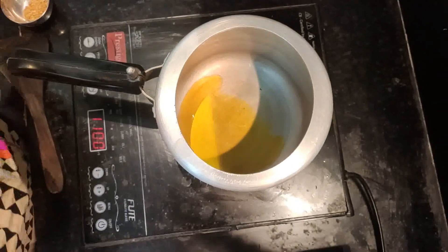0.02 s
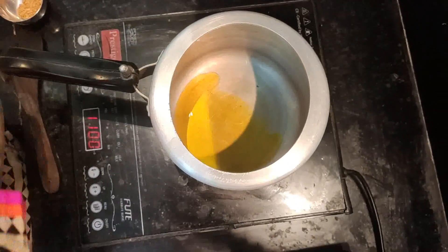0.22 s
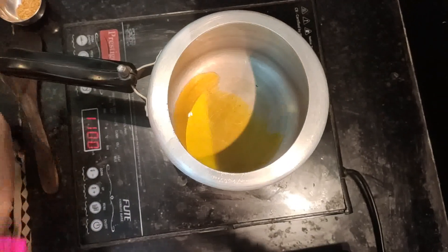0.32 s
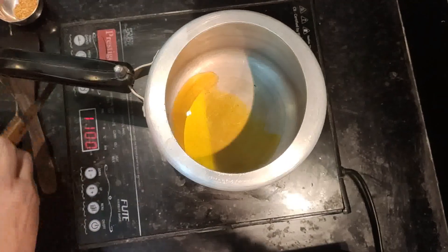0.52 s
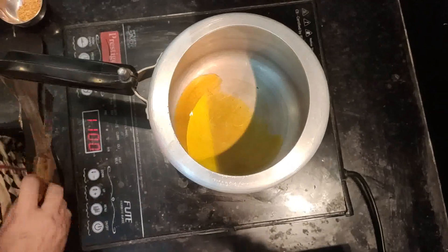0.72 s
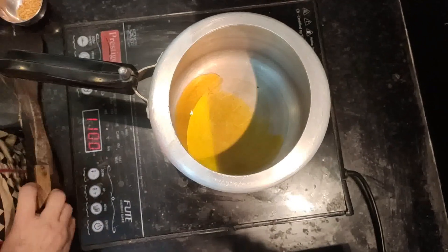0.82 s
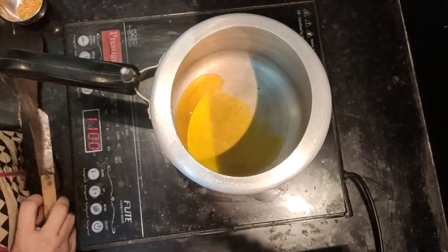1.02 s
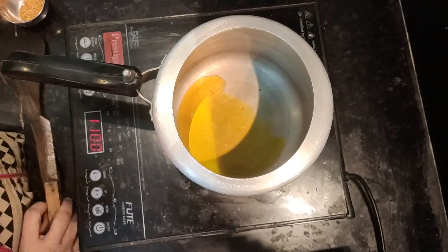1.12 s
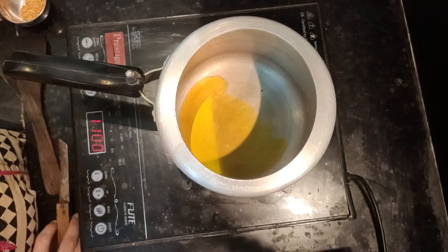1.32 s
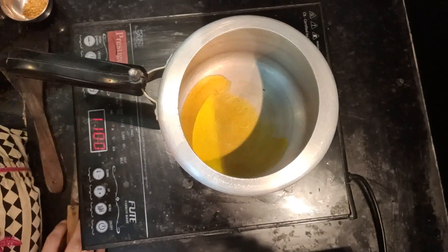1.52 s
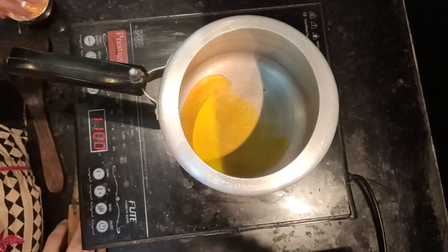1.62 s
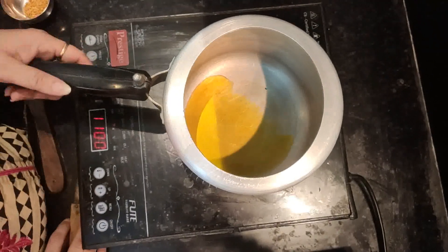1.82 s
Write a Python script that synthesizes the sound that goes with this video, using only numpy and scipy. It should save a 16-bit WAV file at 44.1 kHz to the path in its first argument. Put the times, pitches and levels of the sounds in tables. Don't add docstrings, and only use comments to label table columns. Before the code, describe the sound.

Constant cooktop fan drone and soft vent hiss, picked up close in stereo; a sharp knife knock on stone comes first, then a ringing dish clink, then a quick high tumbler rattle with brief room echo.

```python
import sys
import numpy as np
from scipy import signal
from scipy.fft import rfft, irfft
from scipy.io import wavfile
from scipy.ndimage import uniform_filter1d

SR = 44100
rng = np.random.default_rng(int(sys.argv[2]) if len(sys.argv) > 2 else 0)


def store_wav(level_fs):
    pcm = np.round(np.clip(np.atleast_2d(level_fs), -1, 1) * 32767)
    wavfile.write(sys.argv[1], SR, pcm.T.astype(np.int16))


def linear_from_db(decibels):
    return 10 ** (np.asarray(decibels, float) / 20)


N = 81585


def evened(x):
    return x / np.sqrt(np.mean(x ** 2) + 1e-20)


def read(points, hz):
    f, value = np.transpose(points)
    return np.interp(np.log(hz + 1), np.log(f + 1), value)


def add(mix, start_s, sound):
    part = mix[max(round(start_s * SR), 0):][:len(sound)]
    part += sound[:len(part)]


# start_s, pitch_hz, level_db
FAN = [(0, 282.3, -44.5), (.25, 281.8, -41), (.45, 279.3, -44.5), (.9, 280.3, -44), (1.2, 283.1, -43.5),
       (1.6, 282.2, -41.5), (1.85, 281, -46)]
# multiple, level_db
OVERTONES = [(2, -17), (4, -17)]
# start_s, level_db
MAINS_SWELL = [(0, -56), (.7, -51.5), (1.15, -48.5), (1.5, -53.5), (1.85, -54)]
# pitch_hz, rms_db, width_hz
LOW_LINES = [(17.975, -55, 5.5), (101.1, -51.5, 6.1)]
# freq_hz, lead_rad
LEAD = [(30, -.03), (300, -.14), (1290, -.3), (2500, -1)]


def hum():
    mains_hz = 49.1
    t = np.arange(N) / SR
    right = np.array([[0], [1]])
    lag = 1 - right
    start_s, pitch_hz, level_db = np.transpose(FAN)
    turn = 2 * np.pi * np.cumsum(np.interp(t, start_s, pitch_hz)) / SR
    blade = np.sin(turn + read(LEAD, pitch_hz.mean()) * lag)
    for multiple, overtone_db in OVERTONES:
        blade = blade + linear_from_db(overtone_db) * np.sin(multiple * turn - 0.81 * lag)
    mains = np.sin(2 * np.pi * mains_hz * t - 0.27 * lag)
    tone = linear_from_db(np.interp(t, start_s, level_db)) * np.sqrt(2) * blade
    tone += linear_from_db(np.interp(t, *np.transpose(MAINS_SWELL))) * np.sqrt(2) * mains

    for line_hz, rms_db, width_hz in LOW_LINES:
        pole = np.exp(-np.pi * abs(width_hz) / SR)
        z = rng.standard_normal((2, N + SR))
        waver = signal.lfilter([1], [1, -pole], z[0] + 1j * z[1])
        waver = signal.lfilter([1], [1, -pole], waver)[SR:]
        line = np.exp(-.2j * lag) * waver * np.exp(2j * np.pi * line_hz * t)
        tone += linear_from_db(rms_db) * evened(line.real)
    return tone * linear_from_db(.7 - 1.4 * right)


# freq_hz, density_db_per_hz
AIR = [(25, 3.5), (200, -4.5), (700, -2), (1500, -3.5), (2200, -6.5), (4000, -13.5), (8000, -19.5),
       (13000, -20)]
# freq_hz, width_hz, boost_db
VENT = [(356.5, 239, 10.5), (522, 57, -8.5), (594, 38, 6), (756, 50, 5.5), (1010, 100, 7), (1334, 90, 7),
        (1844, 80, 2.5), (7540, 300, 4.5), (11800, 1200, 8.5)]
# freq_hz, likeness_0_to_1
SAME = [(60, .98), (180, .96), (380, .95), (660, .4), (1200, .2), (2200, 0), (13100, 0)]
# freq_hz, left_over_right_db
LEAN = [(60, 1.5), (230, 2), (890, 0.0), (3410, 0.31), (13100, 1.5)]


def air():
    level_db, patchy_db, swell_db = -41.5, 1.5, 0.08
    frames, hz = N // 512 + 5, np.fft.rfftfreq(2048, 1 / SR)
    a, b, c, d, p = rng.standard_normal((frames, 1025, 5)).T
    patches = uniform_filter1d(p, size=20, axis=0)
    patches = evened(uniform_filter1d(patches, size=6, axis=1))
    swell = evened(uniform_filter1d(p[0], size=12))
    colour_db = read(AIR, hz)
    for f, width_hz, boost_db in VENT:
        colour_db = colour_db + boost_db / (1 + (2 * (hz - f) / width_hz) ** 4)
    same = np.clip(read(SAME, hz), 0, 1)[:, None]
    left = a + 1j * b
    shared = same * left * np.exp(-1j * read(LEAD, hz))[:, None]
    right = shared + np.sqrt(1 - same ** 2) * (c + 1j * d)
    lean = linear_from_db(read(LEAN, hz) / 2)[:, None]
    z = np.array([left * lean, right / lean])
    z = z * linear_from_db(colour_db[:, None] + patchy_db * patches + swell_db * swell)
    return linear_from_db(level_db) * evened(signal.istft(z, nperseg=2048, noverlap=1536)[1][:, :N])


# freq_hz, level_db, t60_s
KNIFE = [(365, -3, .07), (430, -7, .06), (752, -10, .12), (960, -9, .04), (2600, -4, .035), (3074, -6, .05),
         (3540, -6, .06), (3940, -4, .05), (4904, -14, .17), (6085, -4, .03), (7063, -12, .2),
         (7973, -7, .04), (9436, -1, .03), (11130, -5, .025)]
# freq_hz, density_db_per_hz
KNIFE_CRACK = [(250, -13), (385, -6), (800, -7.5), (1520, -23), (3050, -7.5), (5300, -10), (9500, -9),
               (13000, -16)]
# start_s, ring_db, crack_db, left_over_right_db, tilt_db_per_oct
KNIFE_HITS = [
    (.4862, -53, -50, 12, -7.5),
    (.4886, -19.5, -8.5, 2, 3.5),
    (.4915, -38, -12.5, -2, 3),
    (.4942, -25.5, -18.5, -1.5, -0.5),
    (.5015, -44.5, -23.5, 2, 3),
    (.5405, -52, -41, -3, -4),
]


def knife():
    return knocks(KNIFE_HITS, KNIFE, KNIFE_CRACK, crack_s=0.021, rise_s=0.0002, room_db=-5.5)


# freq_hz, level_db, t60_s
DISH = [(448, -22, .1), (1750, -19, .07), (1986, -22, .1), (3700, -19, .08), (3908, -21, .15),
        (4248, -7, .09), (4358, 1, .1), (4427, -15, .42), (4486, -12, .22), (4900, -23, .08),
        (8170, -24, .35), (8250, -23, .3), (8330, -8, .1), (8480, -13, .08)]
# freq_hz, density_db_per_hz
DISH_CRACK = [(300, -25), (500, -10), (1200, -5), (1800, 1.5), (3800, -5), (5700, -18), (8400, -10.5),
              (12300, -23)]
# start_s, ring_db, crack_db, left_over_right_db, tilt_db_per_oct
DISH_HITS = [
    (1.0535, -16, -28.5, 0.97, -1),
    (1.0645, -19.5, -28, 0.98, 2.5),
    (1.0735, -33.5, -27, 0.77, -6),
    (1.113, -33.5, -37, 0.27, -3.5),
    (1.149, -49, -43, 0, -8),
    (1.272, -52, -54, 0.3, 16),
    (1.32, -57.5, -50.5, 0.017, 15),
]


def dish():
    return knocks(DISH_HITS, DISH, DISH_CRACK, crack_s=0.093, rise_s=0.0017, room_db=-5.5)


# freq_hz, level_db, t60_s
TUMBLER = [(2480, -11, .05), (3700, -10, .05), (4940, 0, .09), (4985, -12, .3), (5690, -13, .05),
           (6200, -12, .05), (7931, -3, .07), (7997, -10, .22), (9609, -10, .05), (10370, -10, .04),
           (10850, -10, .05)]
# freq_hz, density_db_per_hz
TUMBLER_CRACK = [(1000, -10), (2500, -11.5), (4910, -2.5), (6500, -5), (10600, -0.5), (12500, -13)]
# start_s, ring_db, crack_db, left_over_right_db, tilt_db_per_oct
TUMBLER_HITS = [
    (1.497, -60, -52, 0, 0),
    (1.5115, -40, -38, 0, 0),
    (1.5232, -28, -34, 0, -4),
    (1.5282, -34, -31, 0, 5),
    (1.5385, -41, -33, 0, 0),
    (1.555, -44, -41, 0, -2),
    (1.812, -58, -49, 0, 2),
    (1.8462, -43, -31, 0, 3),
]


def tumbler():
    return knocks(TUMBLER_HITS, TUMBLER, TUMBLER_CRACK, crack_s=0.098, rise_s=0.00054, room_db=-5)


def knocks(hits, modes, crack, crack_s, rise_s, room_db):
    right_early_s, ring_in_room_db, thin_hz = .0003, -4, 274
    t = np.arange(SR // 2) / SR
    rings, cracks = np.zeros((2, N)), np.zeros((2, N))
    hz, db, t60_s = np.transpose(modes)[:, :, None]
    colour = linear_from_db(read(crack, np.fft.rfftfreq(len(t), 1 / SR)))
    alternate = np.pi * np.arange(len(modes))[:, None]
    phases = [alternate, rng.uniform(0, 2 * np.pi, (len(modes), 1))]
    rise = np.minimum(t / max(rise_s, 1e-5), 1)
    for start_s, ring_db, crack_db, pan_db, tilt_db in hits:
        noise = rfft(rng.standard_normal((2, len(t)))) * colour
        noise = evened(irfft(noise, len(t)))
        mode_amp = linear_from_db(db + tilt_db * np.log2(hz / 4000) - 60 * t / t60_s)
        for side in (0, 1):
            ring = (mode_amp * np.sin(2 * np.pi * hz * t + phases[side])).sum(0)
            at_s = start_s - side * right_early_s
            pan = linear_from_db(pan_db * (.5 - side))
            add(rings[side], at_s, pan * linear_from_db(ring_db) * rise * ring)
            add(cracks[side], at_s, pan * linear_from_db(crack_db - 60 * t / crack_s) * noise[side])
    out = rings + cracks + linear_from_db(room_db) * kitchen(cracks + linear_from_db(ring_in_room_db) * rings)
    thin = signal.butter(4, thin_hz, "high", fs=SR, output="sos")
    left, right = rfft(signal.sosfilt(thin, out))
    same = np.clip(read(SAME, np.fft.rfftfreq(N, 1 / SR)), 0, 1)
    return irfft(np.array([left, same * left + np.sqrt(1 - same ** 2) * right]), N)


# freq_hz, t60_s
ROOM = [(250, 0.41), (1000, 0.43), (3500, 0.45), (8000, .33), (12000, 0.32)]


def kitchen(x):
    taps = np.zeros((2, SR // 2))
    slots = np.arange(200, SR // 2 - 20, 20)
    at = slots + rng.integers(0, 20, (2, len(slots)))
    np.put_along_axis(taps, at, rng.choice([-1., 1.], at.shape), 1)
    hz, t, z = signal.stft(taps, SR, nperseg=256)
    t60_s = np.maximum(read(ROOM, hz), .02)[:, None]
    tail = signal.istft(z * linear_from_db(-60 * t / t60_s), SR, nperseg=256)[1]
    return signal.fftconvolve(x, tail / np.linalg.norm(tail[0]), axes=1)[:, :N]


def scene():
    return hum() + air() + knife() + dish() + tumbler()


def top_cut(x):
    return signal.sosfilt(signal.butter(12, 13720, fs=SR, output="sos"), x)


def record(dry):
    edge_hz = 12400
    lowpass = signal.firwin(511, edge_hz, window=("kaiser", 9), fs=SR)
    mix = signal.oaconvolve(dry, lowpass[None], "same")
    return top_cut(mix)


dry = scene()
out = record(dry)
store_wav(out)
```